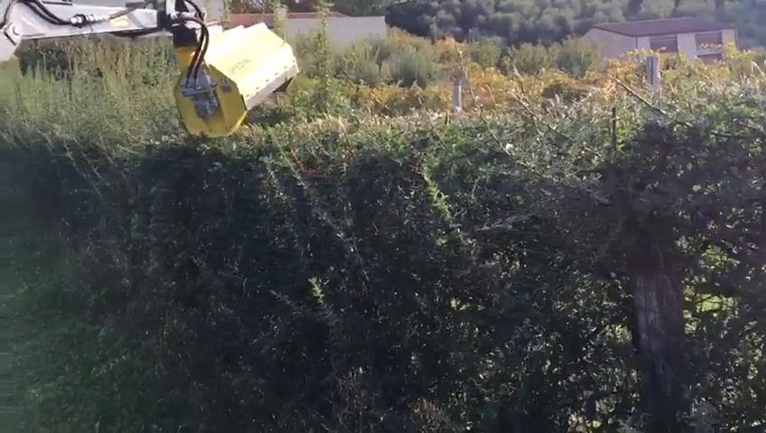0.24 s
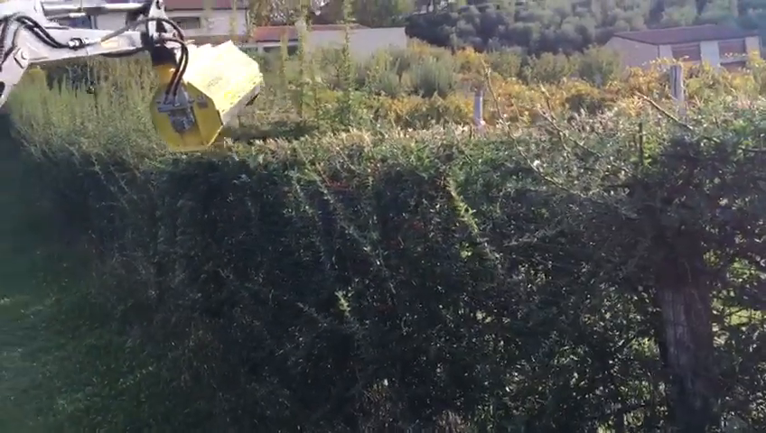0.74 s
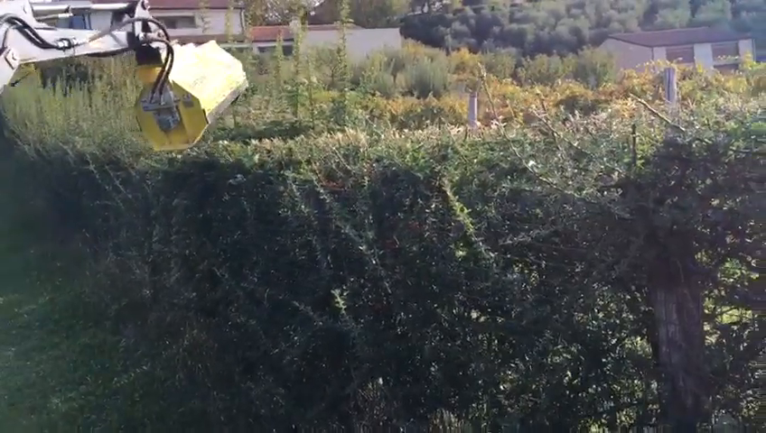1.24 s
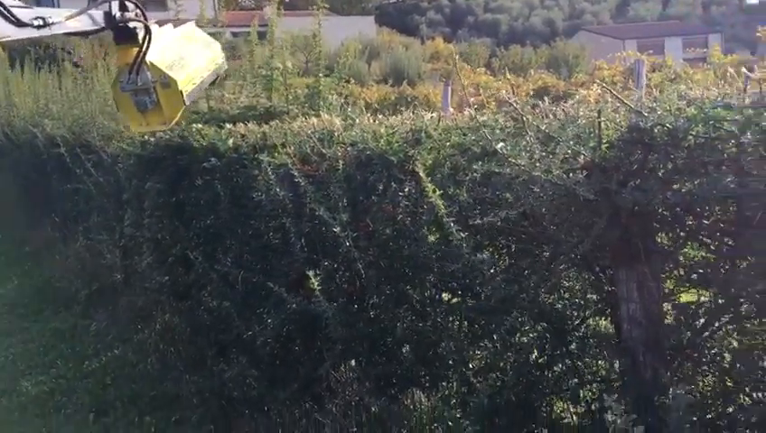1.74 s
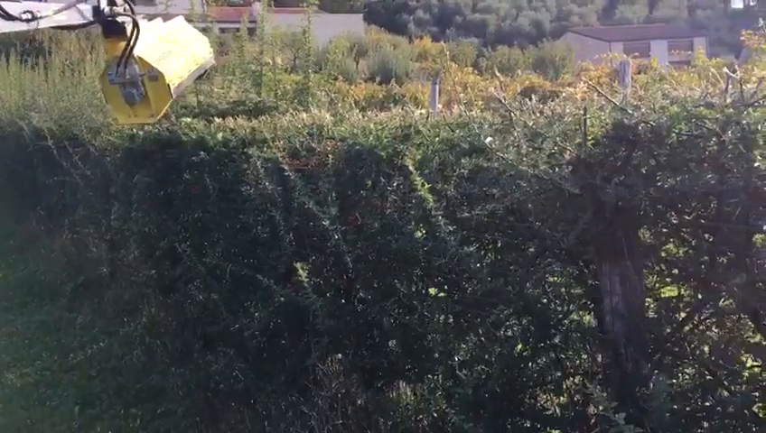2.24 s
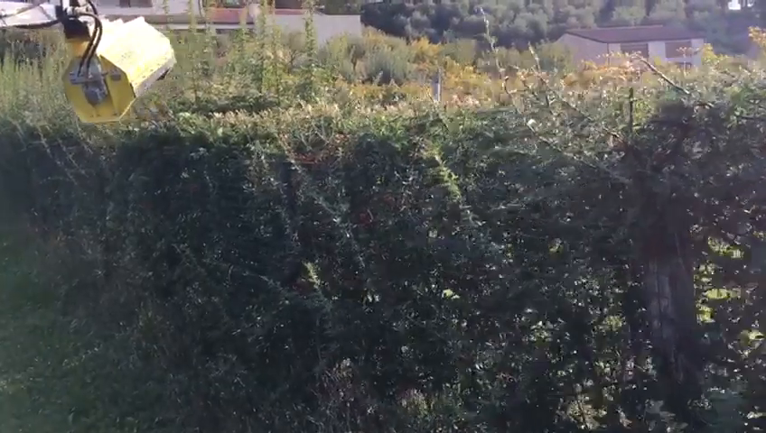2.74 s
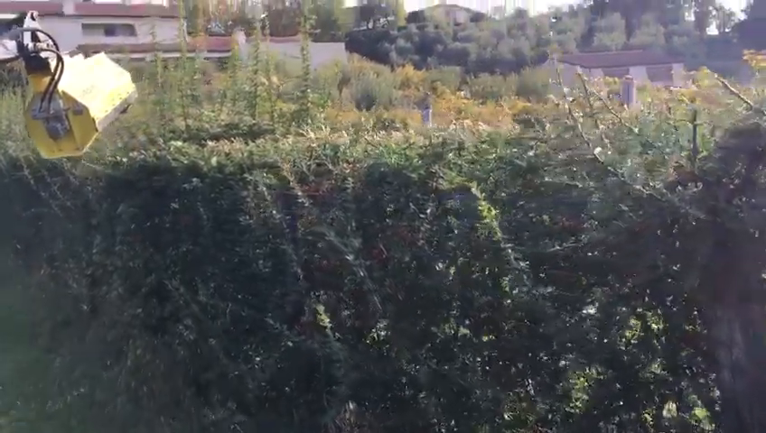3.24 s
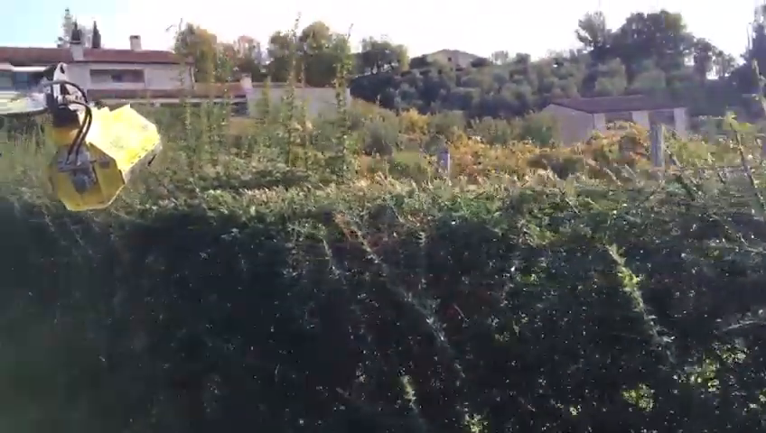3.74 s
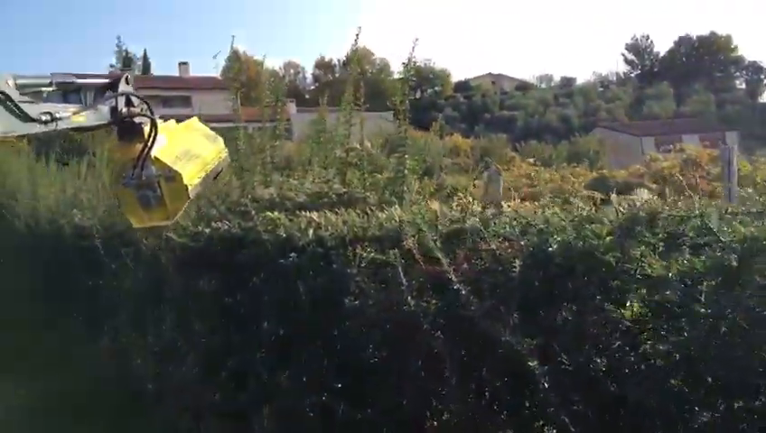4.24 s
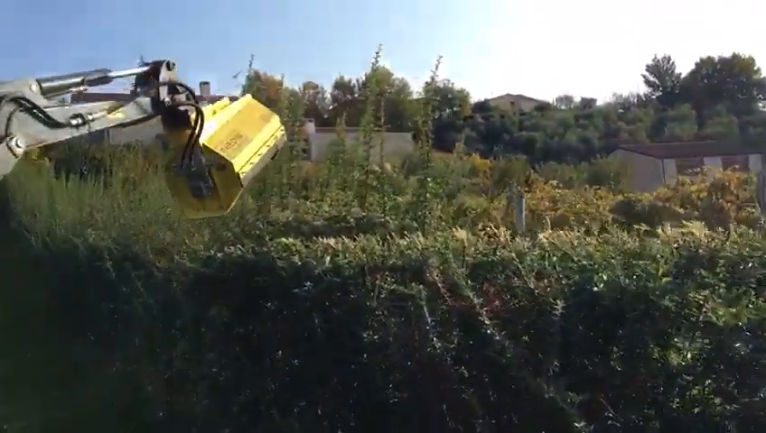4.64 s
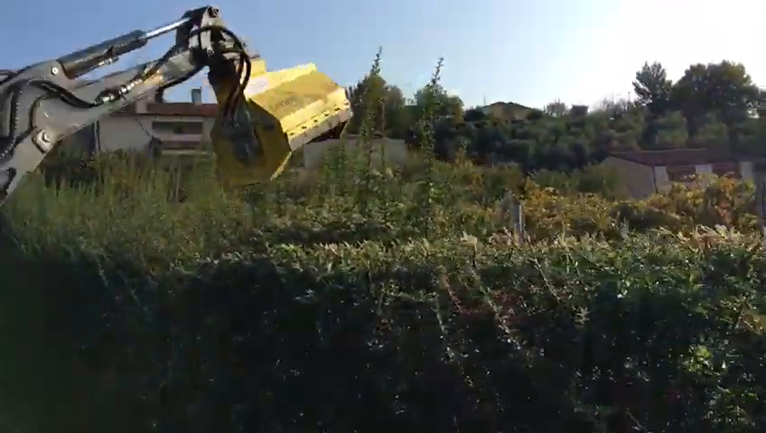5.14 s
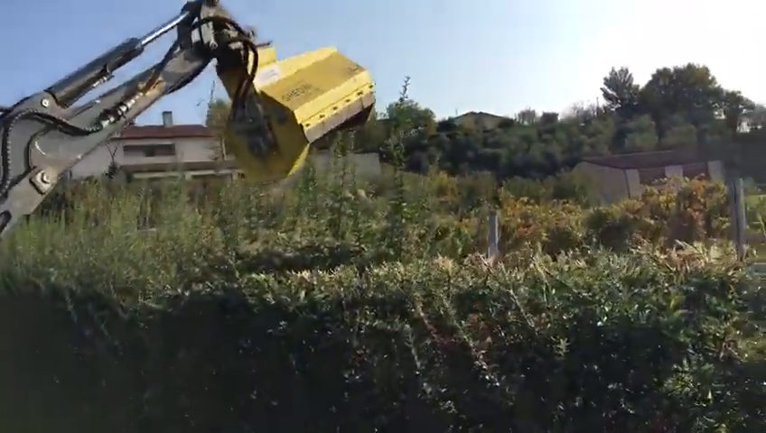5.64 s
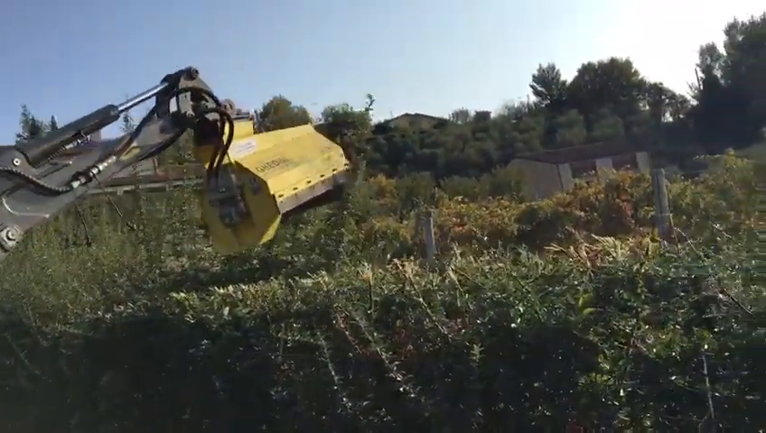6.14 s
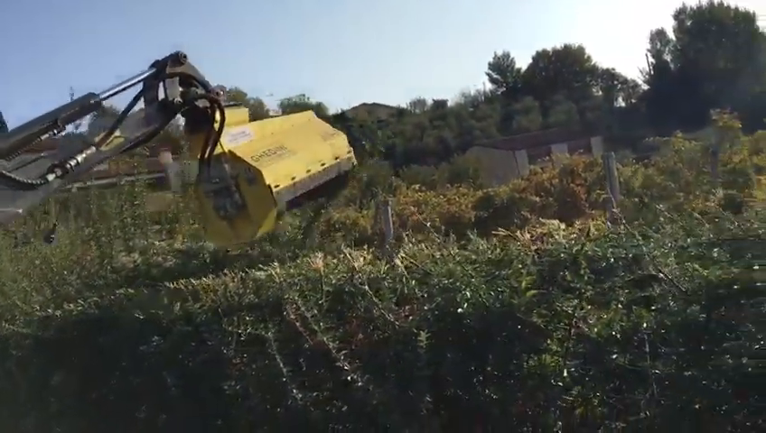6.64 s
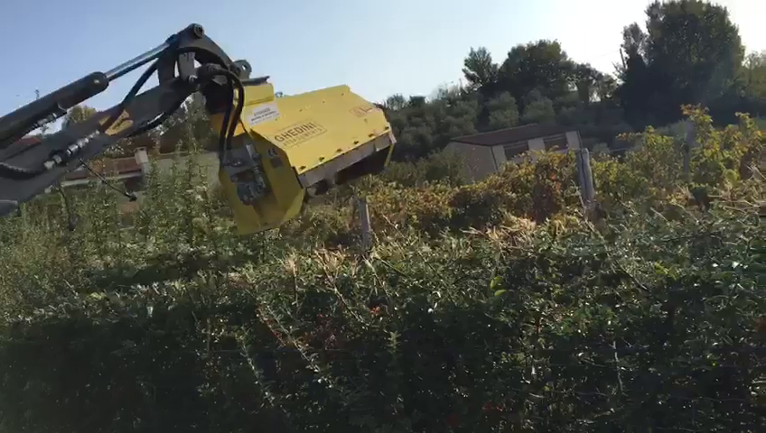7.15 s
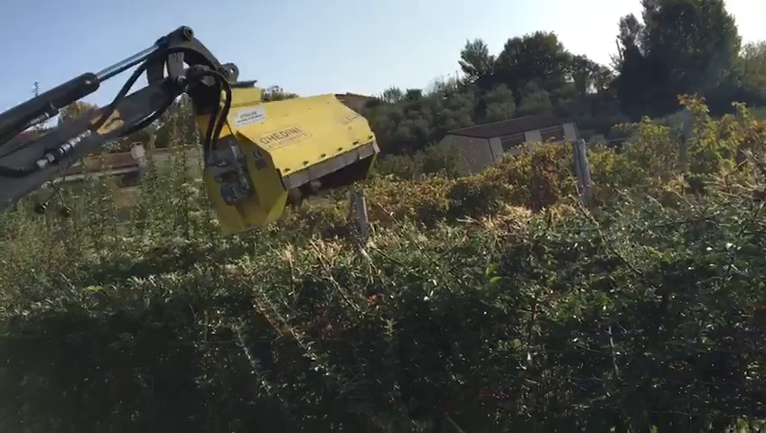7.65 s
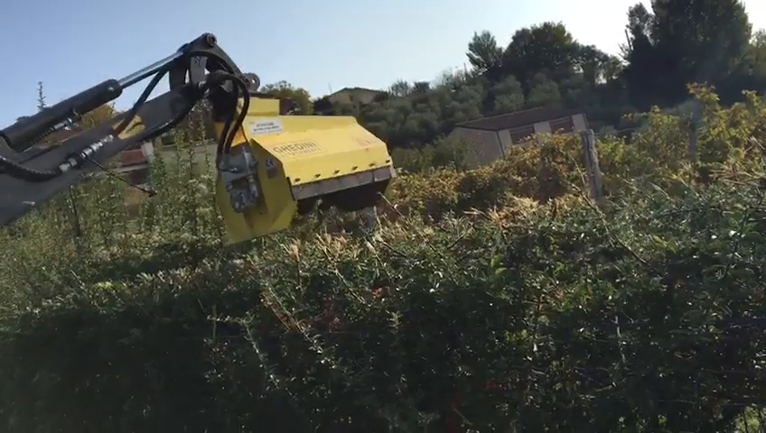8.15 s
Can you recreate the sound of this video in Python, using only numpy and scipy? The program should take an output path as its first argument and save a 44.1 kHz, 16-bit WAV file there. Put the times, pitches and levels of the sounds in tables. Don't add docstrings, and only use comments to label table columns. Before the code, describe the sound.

Continuous compact excavator noise in open air: a low pulsing diesel hum dips briefly as the arm moves, then recovers. The hydraulic flail motor's gear whine climbs, falls and climbs again, with airy rush and fine leafy hiss. Two brighter, rougher hissing bites come at about two and five seconds, then a dense burst of twig snaps just before seven. Mono handheld-style pickup from nearby, no echo, slightly dull and fluttery at the very top.

```python
import sys
import numpy as np
from scipy import signal
from scipy.io import wavfile
from scipy.ndimage import uniform_filter1d

SR = 44100
rng = np.random.default_rng(int(sys.argv[2]) if len(sys.argv) > 2 else 0)


def amplitude_ratio(level_db):
    exponent = np.asarray(level_db, float) / 20
    return 10 ** exponent


def persist_wave(psi):
    counts = np.round(np.clip(psi, -1, 1) * 32767).astype(np.int16)
    wavfile.write(sys.argv[1], SR, np.atleast_2d(counts).T)


N = 369999
FIRING_DEG, STRONG_DEG = 57, 200


def rms_one(x):
    return x / np.sqrt(np.mean(x ** 2) + 1e-20)


def in_time(rows):
    s, *columns = np.transpose(rows)
    return [np.interp(np.arange(N) / SR, s, column) for column in columns]


def drift(rate):
    r = np.exp(-80 * np.pi * rate / SR)
    noise = rng.standard_normal(N // 40 + 2002)
    slow = signal.lfilter([1], [1, -2 * r, r * r], noise)[2000:]
    return np.interp(np.arange(N) / 40, np.arange(len(slow)), rms_one(slow - slow.mean()))


def tone(turns, level_db):
    return np.sqrt(2) * amplitude_ratio(level_db) * np.cos(2 * np.pi * turns)


def filtered(x, order, hz, kind):
    return signal.sosfilt(signal.butter(order, hz, kind, fs=SR, output="sos"), x)


def ring(clicks, modes):
    out = 0
    for hz, level_db, t60 in modes:
        r = amplitude_ratio(-60 / (t60 * SR))
        w = 2 * np.pi * hz / SR
        mode = signal.lfilter([0, amplitude_ratio(level_db) * np.sin(w)], [1, -2 * r * np.cos(w), r * r], clicks + 1e-18)
        out = out + mode
    return out


def dying(clicks, t60):
    return signal.lfilter([1], [1, -amplitude_ratio(-60 / (t60 * SR))], clicks + 1e-18)


def coloured(white, spectrum, patchy_db):
    hz, level_db = np.transpose(spectrum)
    edges = hz[0] * 2 ** np.arange(0, np.log2(hz[-1] / hz[0]) + .34, 1 / 3)
    out = 0
    for k, (low, high) in enumerate(zip(edges, edges[1:])):
        band = filtered(white[k % 2], 2, [low, high], "band")
        own_db = np.interp(np.log(low * high) / 2, np.log(hz), level_db)
        out = out + amplitude_ratio(own_db + patchy_db * drift(6.2)) * band
    return rms_one(out)


def peaks(x, table):
    for hz, width_hz, gain_db in table:
        w, g = 2 * np.pi * hz / SR, np.sqrt(amplitude_ratio(gain_db))
        a = np.sin(w) * width_hz / hz / 2
        x = signal.lfilter([1 + a * g, -2 * np.cos(w), 1 - a * g], [1 + a / g, -2 * np.cos(w), 1 - a / g], x)
    return x


def plateau(start, end, ramp_s):
    t = np.arange(N) / SR
    return np.clip(np.minimum(t - start, end - t) / ramp_s, 0, 1)


def surging_db(idle_db, rows, ramp_s):
    power = amplitude_ratio(idle_db) ** 2
    for start, end, level_db in rows:
        power = power + (amplitude_ratio(level_db) * plateau(start, end, ramp_s)) ** 2
    return 10 * np.log10(power)


def loaded_db(law, load):
    base_db, db_per_hz, slew_db = law
    sag_hz, slew = load
    return base_db + db_per_hz * sag_hz + slew_db * slew


# (frequency [Hz], level [dB per Hz])
WIND_SPECTRUM = [(500, -12.5), (1000, -0.5), (1500, -4.5), (2200, -5.5), (3300, -8.5), (4400, -11),
                 (6000, -22)]


def flail_wind(feed_db):
    level_db = -32.5 + 0.61 * (feed_db + 42.5)
    return amplitude_ratio(level_db) * coloured(rng.standard_normal((2, N)), WIND_SPECTRUM, patchy_db=1.77)


# (frequency [Hz], level [dB per Hz])
ROAR_SPECTRUM = [(16, -13), (28, -11), (45, -2), (80, 3.5), (130, 0), (350, -2.5), (520, -3), (700, -7.5),
                 (1000, -16.5), (1800, -22)]
# (frequency [Hz], width [Hz], gain [dB])
BONNET = [(375, 59, 4), (456, 42, -8.5), (683, 25, 7), (870, 46, 0.5)]


def roar(cycle, load):
    level_db = loaded_db((-29, -0.1, -0.54), load)
    noise = amplitude_ratio(level_db) * coloured(rng.standard_normal((2, N)), ROAR_SPECTRUM, patchy_db=1.0)
    throb = amplitude_ratio(2.0 * np.cos(6 * np.pi * (cycle - FIRING_DEG / 360)))
    return throb * peaks(noise, BONNET)


# (time [s], shredding level [dB])
FEED = [(0.0, -42), (1.17, -42), (1.42, -41.5), (1.89, -42), (2.27, -39), (2.61, -40), (3.88, -42.5),
        (4.11, -40), (4.49, -42), (4.84, -40.5), (5.05, -40.5), (5.16, -39), (5.4, -41), (5.77, -43),
        (6.75, -42.5), (6.96, -39.5), (7.12, -42.5), (8.39, -40)]


def foliage_feed():
    return in_time(FEED)[0]


# (frequency [Hz], level [dB per Hz])
LEAVES = [(2000, -13.5), (4000, 1.5), (5500, 1), (7000, -0.5), (9000, -2), (11000, -12.5)]


def shredding(feed_db):
    sizes_db = 3.9 * np.minimum(rng.exponential(1, (2, N)), 5)
    sizes = amplitude_ratio(sizes_db) * rng.choice([-1, 1], (2, N))
    ticks_per_s = 9000 * amplitude_ratio(1.6 * drift(40))
    ticks = sizes * (rng.random((2, N)) < ticks_per_s / SR)
    return amplitude_ratio(feed_db + 1.5) * coloured(ticks, LEAVES, patchy_db=0.76)


# (time [s], peak level [dB], share of body below 4 kHz [dB])
SNAPS = [(1.3682, -24.5, -2), (6.357, -24, -14), (6.383, -23, -8), (6.803, -16.5, -12),
         (6.8249, -19.5, -10), (6.839, -21, -16), (6.8657, -23, -11), (6.8798, -12, -8), (6.8864, -33, 8),
         (6.8916, -16.5, -14), (6.9035, -16, -3.5), (6.916, -17, -10), (6.9294, -26, -18),
         (6.9394, -43, -6), (6.9776, -22, -6), (6.988, -32, 4)]
# (frequency [Hz], level [dB], 60 dB decay [s])
HOOD = [(1950, -5, .006), (3500, 0, .005), (4300, -1, .004), (7200, -3, .008)]


def snaps():
    s, peak_db, body_db = np.transpose(SNAPS)
    at = (s * SR).astype(int)
    bright, body = np.zeros((2, N))
    bright[at] = amplitude_ratio(peak_db)
    body[at] = amplitude_ratio(peak_db + body_db)
    crack = (dying(bright, 0.043) + 0.18 * dying(bright, 0.2)) * rng.standard_normal(N)
    crack = filtered(crack, 2, 4500, "high")
    thud = dying(body, .025) * rng.standard_normal(N)
    return amplitude_ratio(-6.0) * crack + amplitude_ratio(-13.5) * ring(thud, HOOD)


# (time [s], tooth frequency [Hz])
MOTOR = [(0, 438.6), (.3, 441), (.6, 451), (1.07, 454), (1.5, 503), (1.68, 513), (2.4, 493.5), (3.3, 465),
         (3.76, 456), (4.2, 504.5), (4.33, 506.5), (5.2, 480.5), (6.02, 455.5), (6.55, 472), (7.28, 475),
         (7.85, 521), (8.1, 532.6), (8.39, 537)]


def motor_speed():
    return in_time(MOTOR)[0]


# (start [s], end [s], hiss [dB], rough whine [dB])
BITES = [
    (1.99, 2.496, -36.5, -56),
    (4.811, 5.361, -38, -49),
]
ROUGH_PARTIALS = [5, 6, 8, 11, 12, 14, 18, 20]


def bites(motor_hz):
    turns = np.cumsum(motor_hz) / SR
    hiss = filtered(rng.standard_normal(N), 2, 5000, "high")
    rough = sum(drift(35) * tone(k * turns, -4 * np.log2(k / 12)) for k in ROUGH_PARTIALS)
    out = 0
    for start, end, hiss_db, rough_db in BITES:
        out = out + plateau(start, end, .04) * (amplitude_ratio(hiss_db) * hiss + amplitude_ratio(rough_db) * rough)
    return out


# (frequency [Hz], width [Hz], level within its group [dB])
WHINE = [(478, 55, -.6), (1000, 300, -3), (1510, 250, -7), (1880, 200, -8), (2900, 1500, -6),
         (4300, 500, -6), (5250, 250, -7), (5900, 400, -2), (6300, 300, -1.5), (7050, 200, -8),
         (7350, 260, -3), (8600, 500, -13)]
# (start [s], end [s], low partials [dB], high partials [dB])
SURGES = [(.1, .55, -45, -55), (.5, 1.05, -43, -54), (.95, 1.75, -36, -52), (2.145, 2.952, -46, -57),
          (3.051, 3.75, -43.5, -59), (3.65, 4.3, -39, -57), (4.699, 5.65, -41.5, -53),
          (5.95, 7.06, -41.5, -49), (6.947, 7.593, -37.5, -48), (7.294, 8.153, -39.5, -45.5),
          (7.944, 8.599, -37, -53.5)]


def flail_motor(motor_hz):
    ramp_s, teeth, flail_rows = .15, 11, 4
    low_db = surging_db(-59, [(start, end, low) for start, end, low, _ in SURGES], ramp_s)
    middle_db = surging_db(-52, [(start, end, -47) for start, end, *_ in BITES], ramp_s)
    high_db = surging_db(-67, [(start, end, high) for start, end, _, high in SURGES], ramp_s)
    turns = np.cumsum(motor_hz) / SR
    grid_hz = np.arange(0, 10000, 5)
    power = 0
    for top_hz, width_hz, level_db in WHINE:
        power = power + amplitude_ratio(level_db) ** 2 / (1 + (2 * (grid_hz - top_hz) / width_hz) ** 4)
    resonance = np.sqrt(power)
    out = tone(turns * flail_rows / teeth + 0.039 * drift(4.4), high_db + 10.5 + 3.8 * drift(3.9))
    for k in range(1, 19):
        if k < 5:
            group_db = low_db
        elif k < 9 or k > 16:
            group_db = middle_db
        else:
            group_db = high_db
        level_db = group_db + 1.3 * drift(2.5) + 1.3 * drift(12)
        partial = tone(k * turns + rng.random() + .04 * drift(9), level_db)
        out = out + np.interp(k * motor_hz, grid_hz, resonance) * partial
    return out


# (start [s], end [s], piston tone [dB])
ARM_MOVES = [
    (-.2, 0.73, -33.5),
    (1.25, 2.0, -36),
    (3.75, 4.201, -35),
    (5.3, 5.55, -40),
    (5.747, 6.8, -33),
    (6.703, 7.906, -36.5),
]
# (level [dB], change per Hz of sag [dB], gain by the slew [dB])
FAN_TONE = (-40, -0.53, 5.73)


def auxiliaries(cycle, load):
    fan_db = loaded_db(FAN_TONE, load) - 2.0 + 2.7 * drift(8.7)
    fan = tone(14.69 * cycle + 0.1 * drift(6.3), fan_db)
    pistons = 20 * cycle + .03 * drift(5)
    pump_db = surging_db(-45, ARM_MOVES, .15) - 1 + 1.2 * drift(6)
    overtones = tone(2 * pistons, -48 + 3 * drift(2.5)) + tone(3 * pistons, -51 + 3 * drift(2.5))
    return fan + overtones + tone(pistons, pump_db)


# (block ring [dB], clatter [dB])
CYLINDERS = [(-3.5, 1.5), (1.5, -2), (-5.5, .5)]
# (frequency [Hz], level [dB], 60 dB decay [s])
BLOCK = [(2350, -0.5, .03), (2170, -2.5, .024), (3400, -7, .012), (4250, -6, .01)]


def knock(cycle, knock_db):
    firing = np.floor(3 * (cycle - (FIRING_DEG - 8) / 360)).astype(int)
    at = np.flatnonzero(np.diff(firing)) + 1
    ring_db, clatter_db = np.array(CYLINDERS)[firing[at] % 3].T
    blows, rattles = np.zeros((2, N))
    uneven = rng.standard_normal((len(at), 2))
    blows[at] = amplitude_ratio(ring_db + 2.0 * uneven[:, 0])
    rattles[at] = amplitude_ratio(clatter_db + 1.9 * uneven[:, 1])
    rough = blows + 0.061 * dying(blows, .006) * rng.standard_normal(N)
    swell = dying(rattles, 0.032) - dying(rattles, 0.0039)
    clatter = swell * filtered(rng.standard_normal(N), 2, [1500, 9500], "band")
    return amplitude_ratio(knock_db) * (amplitude_ratio(-5.5) * rms_one(ring(rough, BLOCK)) + amplitude_ratio(-10.0) * rms_one(clatter))


def engine_load(boom_hz):
    governed_hz, lag_s, slew_start_s, slew_end_s = 99.26, 0.09, 4.43, 4.7
    r = np.exp(-1 / (lag_s * SR))
    sag_hz = governed_hz - boom_hz
    lagged_hz = sag_hz[0] + signal.lfilter([1 - r], [1, -r], sag_hz - sag_hz[0])
    slew = np.clip((np.arange(N) / SR - slew_start_s) / (slew_end_s - slew_start_s), 0, 1)
    return lagged_hz, slew


# (time [s], exhaust boom = six times the four-stroke cycle [Hz], boom [dB], knock [dB])
CRANK = [(0, 96.74, -14, -33.5), (.55, 96.34, -13.5, -31.5), (.95, 101.8, -14.5, -37),
         (1.22, 93.3, -14.5, -34), (1.42, 96.06, -13.5, -31.5), (1.78, 99.2, -14.5, -34.5),
         (2.05, 97.54, -14, -37), (3.3, 99.43, -15, -35.5), (3.7, 101.8, -15.5, -41),
         (3.92, 92.1, -14.7, -32), (4.13, 97.1, -13.5, -34), (5.05, 99.97, -15, -34.5),
         (5.67, 100.3, -15.5, -39), (5.87, 92.95, -15, -40), (6.1, 97.03, -14.9, -38.5),
         (6.9, 97.53, -15.6, -34), (7.5, 95.95, -16, -34.5), (8.15, 98.2, -15.5, -36)]


def crankshaft():
    boom_hz, boom_db, knock_db = in_time(CRANK)
    cycle = .9516 + np.cumsum(boom_hz) / 6 / SR
    return cycle, boom_hz, boom_db, knock_db


# (multiple of the four-stroke cycle, level re boom [dB])
EXHAUST = [(4, -37.5), (5, -31), (6, 0.5), (7, -24), (8, -28.5), (10, -43.5), (13, -40.5), (15, -30),
           (17, -39.5), (18, -27), (21, -39), (23, -38), (24, -29), (27, -38.5), (30, -46)]


def exhaust(cycle, boom_db, load):
    cycle_hz, silencer_hz, silencer_q, lead_rad = 16.3, 105, 5, .6
    levels = [(order, boom_db + db, -db / 14) for order, db in EXHAUST]
    levels += [(3, loaded_db((-25, -1.2, 0.57), load), 0.24),
               (9, loaded_db((-29.5, 1.2, -4.5), load) - .6, 0.66),
               (12, loaded_db((-37, 0.76, 2.2), load) + 0.5, 0.82)]
    out = 0
    for order, level_db, wobble_db in levels:
        ratio = order * cycle_hz / silencer_hz
        lag = lead_rad - np.angle(1 - ratio ** 2 + 1j * ratio / silencer_q)
        at = (STRONG_DEG if order % 3 else FIRING_DEG) / 360
        wander = .015 * wobble_db * drift(5)
        turns = order * (cycle - at) + lag / (2 * np.pi) + wander
        out = out + tone(turns, level_db + (wobble_db + 0.18) * drift(11))
    return out


def scene():
    cycle, boom_hz, boom_db, knock_db = crankshaft()
    load = engine_load(boom_hz)
    feed_db = foliage_feed()
    motor_hz = motor_speed()
    head = flail_wind(feed_db) + shredding(feed_db) + snaps() + bites(motor_hz) + flail_motor(motor_hz)
    engine = roar(cycle, load) + auxiliaries(cycle, load) + knock(cycle, knock_db) + exhaust(cycle, boom_db, load)
    return (head + engine)[None]


def roll_off(x):
    return signal.sosfilt(signal.butter(12, 11170, fs=SR, output="sos"), x)


# (frequency [Hz], width [Hz], gain [dB])
COLOUR = [(2860, 680, -2.5), (3170, 95, 2), (3420, 370, 1.65), (4360, 360, 0.5), (4880, 420, -7),
          (7660, 1500, -3), (5900, 500, 1), (8300, 500, 0.5)]
# (low edge [Hz], high edge [Hz], share of frames heard)
FLICKER = [(10340, 10450, .45), (10470, 10580, .3), (10640, 10780, .25), (10800, 10950, .12)]


def record(dry):
    x = filtered(peaks(dry, COLOUR), 14, 10190, "low")
    out = signal.sosfilt(signal.ellip(14, .3, 70, FLICKER[0][0], fs=SR, output="sos"), x)
    for low, high, share in FLICKER:
        band = signal.sosfilt(signal.ellip(5, .3, 60, [low, high], "band", fs=SR, output="sos"), x)
        power = band ** 2
        loud = uniform_filter1d(power, size=2048)[:, ::1024] > 5 * np.median(power) / .45
        heard = loud | (rng.random(loud.shape) < share)
        gate = np.repeat(heard, 1024, axis=1)[:, :N]
        out = out + uniform_filter1d(gate * 1., size=512) * band
    return roll_off(out)


dry = scene()
out = record(dry)
persist_wave(out)
```